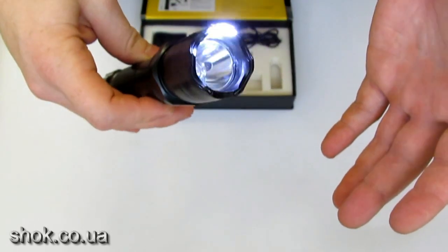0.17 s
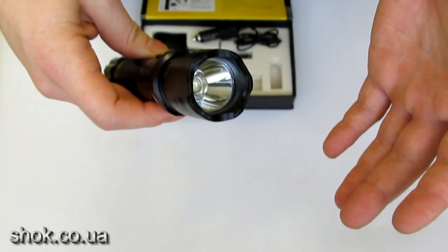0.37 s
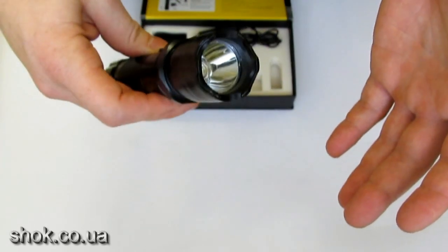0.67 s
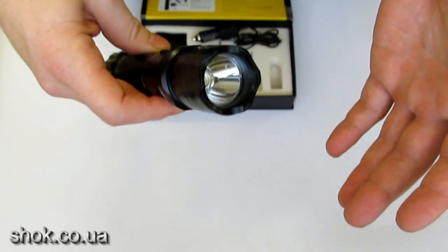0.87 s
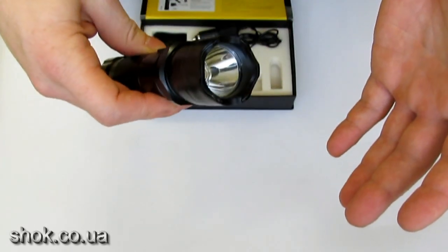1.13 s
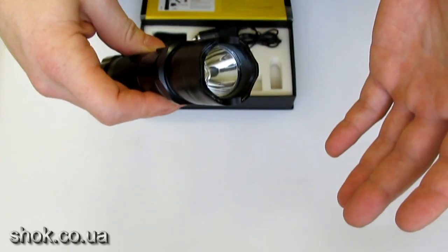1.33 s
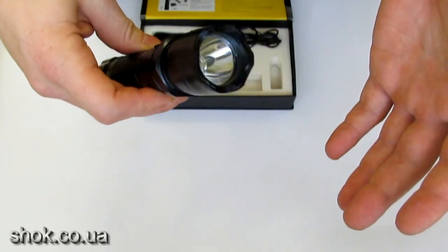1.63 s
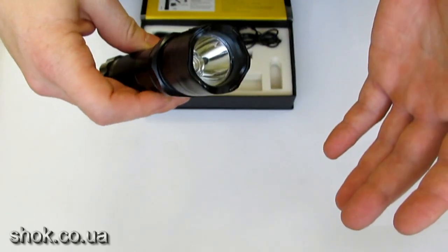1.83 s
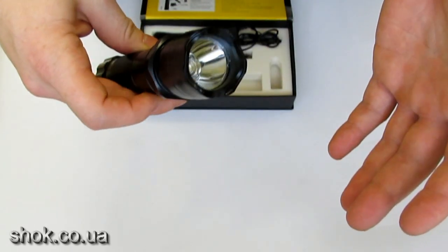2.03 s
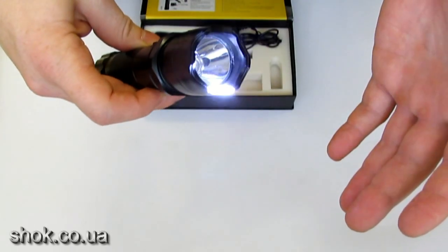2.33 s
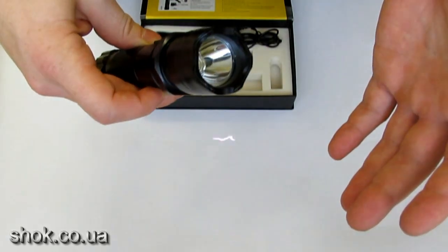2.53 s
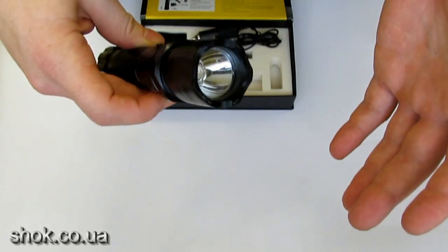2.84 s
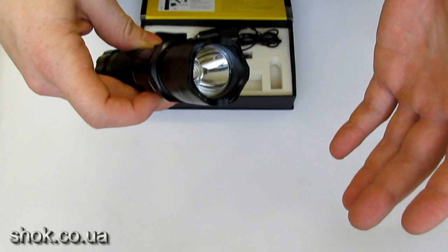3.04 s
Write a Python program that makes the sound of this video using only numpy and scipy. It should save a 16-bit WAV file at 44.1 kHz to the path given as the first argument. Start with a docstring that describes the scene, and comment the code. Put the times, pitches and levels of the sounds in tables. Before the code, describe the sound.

Electric arcing snaps in five sharp, rattling bursts, each leaving a short bright hissing tail.

```python
"""First the tail of an earlier burst dies away, over faint room hum and hiss that last throughout.
A handheld stun device then arcs in five bursts of about 29 sparks a second in a small hard room.
Small button ticks come before the last three bursts. Each spark is shaped noise: a sharp bright crack
that the room draws out into a hiss. Its first arrivals overload the two microphones close by:
pulses, crunchy noise and slow swells make them jump in short low bumps."""
import sys
import numpy as np
from scipy import signal
from scipy.fft import rfft, irfft
from scipy.io import wavfile
from scipy.ndimage import uniform_filter1d

SR = 44100
rng = np.random.default_rng(int(sys.argv[2]) if len(sys.argv) > 2 else 0)


def decibels_to_gain(level_db):
    """Convert a level in decibels to a linear amplitude gain (20 dB per decade)."""
    exponent = np.asarray(level_db, float) / 20
    return 10 ** exponent


def wrap_up_sound(samples):
    """Save the sound to the file named by the first command line argument, as 16-bit audio."""
    columns = np.atleast_2d(samples).T
    # keep every value between -1 and 1, then stretch to whole-number steps
    tamed = np.clip(columns, -1, 1)
    steps = np.round(tamed * 32767).astype(np.int16)
    wavfile.write(sys.argv[1], SR, steps)


N = 141120  # samples, 3.2 s
TAIL = SR // 2  # samples in one crack with its room sound
PAUSE_S = 0.1  # a spark after a longer gap than this opens a burst

# Every spark, and how far it can swing each microphone capsule before each arrival takes its share:
# [t/s, left swing/full scale, right swing/full scale]
SPARK_LIST = [(0.2054, -0.11, 0.25), (0.2407, 0.19, 0.08), (0.2772, 0.2, 0.03), (0.3112, 0.1, 0.09),
              (0.3447, 0.06, 0.12), (0.65, -0.24, 0.17), (0.6882, -0.18, 0.19), (0.723, -0.25, 0.28),
              (0.757, -0.15, 0.19), (0.7919, -0.29, 0.18), (0.829, -0.14, 0.12), (1.0464, -0.16, 0.27),
              (1.0814, -0.11, 0.23), (1.1145, -0.19, 0.27), (1.1488, -0.09, 0.03), (1.1863, -0.22, 0.25),
              (1.4933, -0.23, 0.28), (1.526, -0.07, 0.07), (1.5623, 0.05, 0.2), (1.6013, -0.13, 0.07),
              (1.635, -0.05, -0.23), (1.668, -0.05, 0.23), (1.7013, -0.11, 0.24), (2.2053, 0.14, 0.21),
              (2.241, -0.02, 0.1), (2.2754, -0.16, 0.1), (2.3108, 0.19, -0.28), (2.3437, -0.16, 0.2),
              (2.3791, -0.03, 0.19), (2.4131, -0.09, 0.13), (2.4484, 0.06, 0.04), (2.482, -0.08, -0.06),
              (2.515, -0.04, 0.23), (2.5482, -0.04, -0.39), (2.5829, 0.08, 0.24), (2.617, -0.08, -0.4),
              (2.6523, 0.06, 0.26), (2.6904, -0.1, -0.38), (2.7237, -0.15, -0.38), (2.7631, -0.09, 0.14),
              (2.797, -0.12, 0.25), (2.8306, -0.11, 0.25), (2.8655, -0.05, 0.29)]


def read(points, hz):
    """Reads a curve between its points, along a logarithmic frequency scale."""
    f, value = np.transpose(points)
    return np.interp(np.log(hz + 1), np.log(f + 1), value)


def evened(x):
    """Scales a sound to an rms level of 1."""
    return x / np.sqrt(np.mean(x ** 2))


def pair(size, colour):
    """Spectra of a left and a right noise, partly alike, with the given colour."""
    # how alike left and right are: [f/Hz, likeness from 0 to 1]
    likeness = [(300, 1), (1400, 0.38), (3100, .45), (6800, 0.063), (12000, .2)]
    # left over right: [f/Hz, level/dB]
    balance = [(1000, -0.5), (8000, -1), (14900, 1)]
    hz = np.fft.rfftfreq(size, 1 / SR)
    left, other = rfft(rng.standard_normal((2, size)))
    same = np.clip(read(likeness, hz), 0, 1)
    right = same * left + np.sqrt(1 - same ** 2) * other
    lean_db = read(balance, hz) / 2
    gain = decibels_to_gain(read(colour, hz) + [lean_db, -lean_db])
    return hz, np.array([left, right]) * gain


def floor():
    """Faint room hum and hiss: steady noise, strongest in a narrow low band."""
    # colour of the background, relative level in each Hz: [f/Hz, level/dB]
    colour = [(40, -50), (120, -30), (164, 0), (250, -9), (600, -8), (900, -20), (4000, -29), (15000, -36)]
    level_db = -77
    _, spectrum = pair(size=N, colour=colour)
    return decibels_to_gain(level_db) * evened(irfft(spectrum, N))


def button():
    """Tiny plastic ticks of the button: quickly fading noise with the same room faintly behind it."""
    # [t/s, level/dB]
    ticks = [(1.0244, -50), (1.4602, -46.5), (2.0994, -69.5)]
    t = np.arange(TAIL) / SR
    tick = crack() * (np.exp(-t / 0.0024) + 0.04)  # 0.04 leaves the room sound behind the tick
    out = np.zeros((2, N + TAIL))
    for s, db in ticks:
        at = round(s * SR)
        out[:, at:at + TAIL] += decibels_to_gain(db) * tick
    return out[:, :N]


def arrival_jumps(ms, arrivals, swing, draws):
    """Overload pulses: each arrival pushes a capsule away, and a slow opposite push evens it out."""
    after, width, share, chance = np.transpose(arrivals)
    spread_ms, cusp = 0.08, 1.3  # random timing; power that sets how pointed a pulse is
    centre = after + spread_ms * draws[..., 1]
    distance = abs(ms - centre[..., None]) / width[:, None]
    height = np.outer(swing, share) + chance * draws[..., 0]
    jumps = (height[..., None] * np.exp(-distance ** cusp)).sum(1)
    recovery = np.exp(-ms / 3)  # 3 ms fade
    return jumps - jumps.sum(1, keepdims=True) * recovery / recovery.sum()


def overload_crunch(ms):
    """Mid-pitched noise fading after each spark; burst openings add a short hollow knock."""
    crunch_db, fade_ms, low_hz, high_hz = -23, 8.7, 680, 3080
    opening_db = 1  # extra crunch on the first spark of a burst
    knock_hz, knock_db, knock_ms = 820, -20.5, 3.5
    band = signal.butter(2, [low_hz, high_hz], "band", fs=SR)
    noise = rng.standard_normal((len(SPARK_LIST), 2, len(ms)))
    crunch = evened(signal.lfilter(*band, noise)) * decibels_to_gain(crunch_db) * np.exp(-ms / fade_ms)
    knock = -decibels_to_gain(knock_db) * np.sin(2 * np.pi * knock_hz * ms / 1000) * np.exp(-ms / knock_ms)
    opening = np.diff(np.transpose(SPARK_LIST)[0], prepend=0) > PAUSE_S
    crunch[opening] = crunch[opening] * decibels_to_gain(opening_db) + knock
    return crunch


def bias_swell(ms):
    """The capsule's bias swells back slowly with a low wobble, by a random amount each time."""
    swell_db, swell_ms, spread_db = -32.5, 12, 2.5  # swell_ms is the time of its peak
    settle_db, settle_hz, settle_ms = -47, 30, 23
    swell = decibels_to_gain(swell_db) * (ms / swell_ms) ** 2 * np.exp(2 - 2 * ms / swell_ms)
    wobble = np.sin(2 * np.pi * settle_hz * ms / 1000) * np.exp(-ms / settle_ms)
    swell += decibels_to_gain(settle_db) * wobble
    return swell * decibels_to_gain(spread_db * rng.standard_normal((len(SPARK_LIST), 2, 1)))


def bumps():
    """Both capsules dip as the crack lands, jump with the arrivals, crunch and swell back."""
    # arrivals that overload the capsules:
    # [time after the spark/ms, width/ms, share of the swing, random height/full scale]
    arrivals = [(.95, 0.18, -0.78, 0.09), (1.6, .2, -0.35, 0.11), (2.35, 0.19, 1.77, 0.0067),
                (3.2, 0.081, -0.64, 0.07), (4.4, 0.1, -0.37, 0.18), (5.6, 0.22, -0.087, 0.061)]
    dip_db, dip_ms = -16.5, 0.15
    low_cut_hz, ripple_db = 53, 1  # low cut over all the bumps
    ms = np.arange(6000) * 1000 / SR
    draws = rng.standard_normal((len(SPARK_LIST), 2, len(arrivals), 2))
    grit = overload_crunch(ms) + bias_swell(ms)
    dip = -decibels_to_gain(dip_db) * np.exp(-abs(ms - 0.3) / dip_ms)  # alike in both capsules
    out = np.zeros((2, N + TAIL))
    for (s, *swing), draw, rough in zip(SPARK_LIST, draws, grit):
        at = round(s * SR)
        out[:, at:at + len(ms)] += arrival_jumps(ms, arrivals, swing, draw) + rough + dip
    low_cut = signal.cheby1(2, ripple_db, low_cut_hz, "high", fs=SR)
    return signal.lfilter(*low_cut, out[:, :N])


def crack():
    """One spark heard through the room: every band starts at once and dies at its own speed."""
    # colour of a spark, relative level in each Hz: [f/Hz, level/dB]
    colour = [(100, -56), (500, -24.5), (1300, -20.5), (2200, -14.5), (3800, -8), (7000, -4.5), (10600, 1),
              (13400, -1.5), (14600, -21), (16000, -58)]
    # how long the room takes to fade by 60 dB: [f/Hz, fade time/s]
    room = [(250, 0.1), (800, 0.27), (1800, 0.35), (3500, .33), (6500, 0.29), (10000, 0.24), (14000, 0.17)]
    lump_db, lump_ms = 1.5, 1.5  # echoes arrive in clumps
    early_db, early_s = -2.5, 0.01  # the room's hiss takes a moment to fill in
    wall_s, wall_db, wall_width_s = 0.0165, 2.5, 0.0012  # strong echo from the nearest wall
    hz, spectrum = pair(size=TAIL, colour=colour)
    t = np.arange(TAIL) / SR
    out = 0
    for k, (_, fade_s) in enumerate(room):
        band = read([(f, float(j == k)) for j, (f, _) in enumerate(room)], hz)
        out = out + irfft(spectrum * band) * decibels_to_gain(-60 * t / fade_s)
    out = out / np.sqrt(np.mean(irfft(spectrum) ** 2))
    clump = round(lump_ms * SR / 1000)
    lumps = uniform_filter1d(rng.standard_normal(TAIL), clump)
    lumps = evened(uniform_filter1d(lumps, clump))
    fill_db = early_db * np.exp(-t / early_s)
    echo_db = wall_db * np.exp(-((t - wall_s) / wall_width_s) ** 2)
    sides_db = np.outer([1, 0.5], echo_db)  # the echo is stronger on the left
    return out * decibels_to_gain(lump_db * lumps) * decibels_to_gain(fill_db + sides_db)


def sparks():
    """The arc jumps to a new spot each time: cracks take six partly shared room paths in turn."""
    spark_db, spread_db = -12, 0.6
    earlier_s, earlier_db = -0.16, 4.5  # last spark of the burst before
    opening_db, opening_s = 10, 0.0012  # the first spark after a pause snaps harder
    shared = 0.5  # share of power common to all paths
    cracks = np.array([crack() for _ in range(7)])
    paths = np.sqrt(shared) * cracks[0] + np.sqrt(1 - shared) * cracks[1:]
    times = np.append(earlier_s, np.transpose(SPARK_LIST)[0])
    levels_db = np.append(earlier_db, spread_db * rng.standard_normal(len(SPARK_LIST)))
    openings = np.diff(times, prepend=times[0]) > PAUSE_S
    t = np.arange(TAIL) / SR
    snap_db = opening_db * np.exp(-t / opening_s)
    out = np.zeros((2, N + 2 * TAIL))  # room ahead of the start for the earlier spark
    for k, (s, db, opening) in enumerate(zip(times, levels_db, openings)):
        at = round(s * SR) + TAIL
        out[:, at:at + TAIL] += decibels_to_gain(spark_db + db + opening * snap_db) * paths[k % len(paths)]
    return out[:, TAIL:TAIL + N]


def scene():
    """Adds all layers; the preamp rounds off the loudest cracks."""
    ceiling = 0.95  # full scale is 1
    rounded = ceiling * np.tanh(sparks() / ceiling)
    return floor() + button() + bumps() + rounded


def band_limit(x):
    """A steep low-pass at the top of the band."""
    return signal.sosfilt(signal.butter(12, 15500, fs=SR, output="sos"), x)


def record(dry):
    """Cuts the treble steeply around 15.3 kHz and finishes the mix."""
    edge = signal.firwin(101, 15300, fs=SR)[None]
    mix = signal.oaconvolve(dry, edge, "same")
    return band_limit(mix)


dry = scene()
out = record(dry)
wrap_up_sound(out)
```